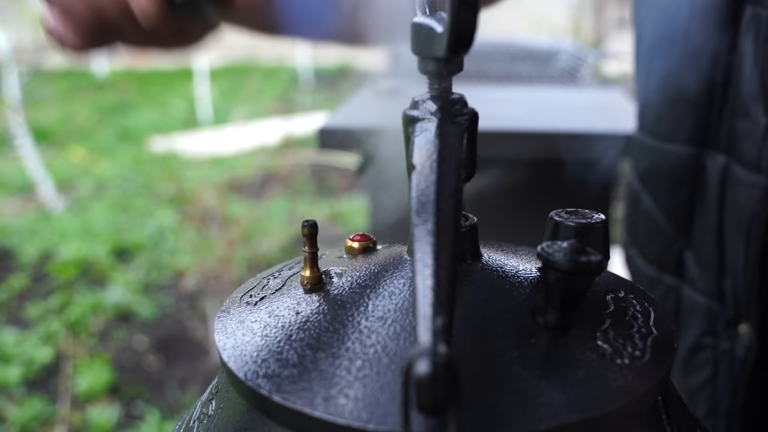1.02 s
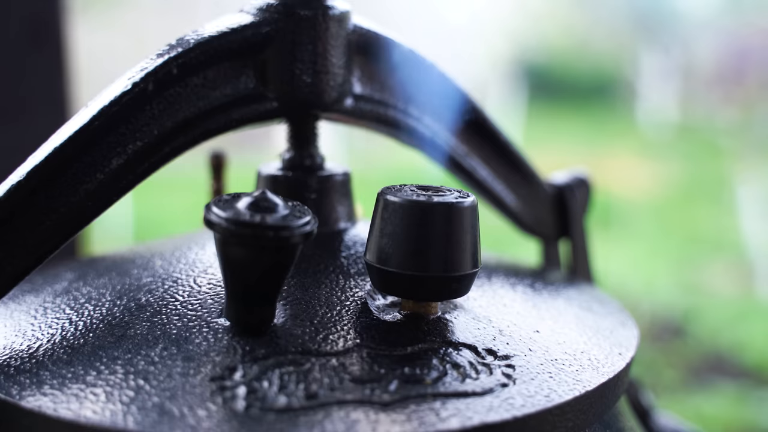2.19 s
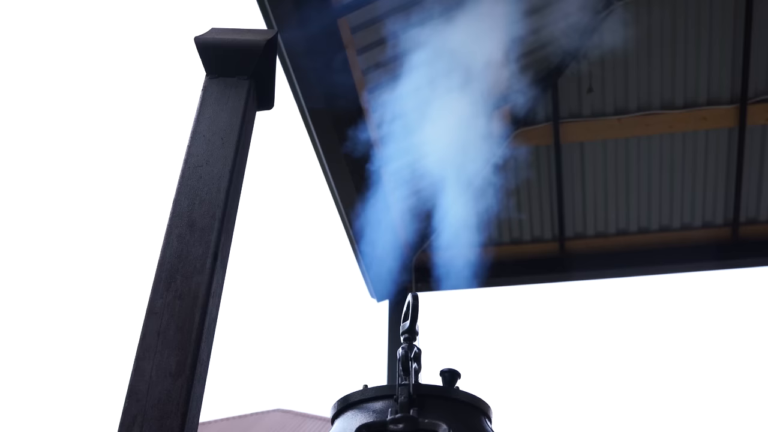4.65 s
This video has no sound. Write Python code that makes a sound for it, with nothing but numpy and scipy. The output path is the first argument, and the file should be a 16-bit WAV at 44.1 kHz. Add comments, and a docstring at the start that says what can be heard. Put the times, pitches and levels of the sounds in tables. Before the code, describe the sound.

A pot's valve sputters out bursts of steam, then hisses more evenly over a faint fire rumble and distant birdsong.

```python
"""Steam escapes from the pressure valve of a cast pot on a garden fire, heard from close by.
At first the jet hisses and the hollow in the valve rings, while far birds sing, mostly covered.
About half a second in, the valve chokes, bursts free with a ring and spits gushes, most falling in pitch.
Side leaks open and shut, the pot knocks once, and near 3.6 s more gushes follow.
Then the steam settles to an even hiss over the low rumble of the fire."""
import sys
import numpy as np
from scipy import signal
from scipy.io import wavfile

SR = 44100
rng = np.random.default_rng(int(sys.argv[2]) if len(sys.argv) > 2 else 0)


def transcribe(u):
    """Save the signal u as a 16-bit wav file named by the first command-line argument.

    u: samples, shape (n,) or (channels, n), limited to [-1, 1]; the rate is SR.
    q: integer samples, one column per channel.
    """
    v = np.clip(np.atleast_2d(u).T, -1, 1)
    q = np.round(v * 32767).astype(np.int16)
    wavfile.write(sys.argv[1], SR, q)


N = 278271
TIME = np.arange(N) / SR

# Gushes of steam, each sliding through the pitches: t/s at GUSH_PIVOT_HZ, fall time/s per octave,
# swell width/s, lowest f/Hz, highest f/Hz, level/dB, ring of the hollow/dB, loss of sizzle/dB
GUSHES = [ (.643, 0.009, 0.021, 1300, 6500, -12.5, -44.5, -1),
          (0.684, 0.0047, 0.022, 560, 1660, -3, -46, -1), (.9, -0.019, 0.025, 1310, 8000, -7.5, -49, 3),
          (.957, -.006, 0.0049, 3800, 14000, -6, -65, -7), (1.002, 0.02, 0.026, 540, 3880, -0.5, -41.5, 8),
          (1.0, -0.0003, 0.012, 6400, 8300, 1, -65, -4), (3.62, 0.037, 0.028, 6800, 9500, -3, -50, 8),
          (3.67, 0.021, 0.033, 328, 3200, 1.5, -51, -5), (3.785, 0.0035, 0.018, 70, 203, 1, -73, -3.5), ]
GUSH_PIVOT_HZ = 3200


def jet():
    """Tiny swirls at the opening hiss, and drops torn off the rim tick. Gushes dim or lift the sizzle."""
    # strength of the jet: t/s, hiss level/dB, sizzle level/dB
    levels = [(0.0, -57, -48.5), (0.22, -57, -46), (0.48, -57, -48.5), (0.6, -59.0, -49),
              (0.63, -46.5, -41.4), (0.68, -43.5, -39.5), (0.85, -47, -37), (1.25, -50.5, -41),
              (1.5, -52, -43.5), (2.25, -53.5, -49.5), (2.28, -53.1, -48), (2.87, -55.5, -47),
              (2.91, -54.5, -41), (3.4, -53, -46.5), (4.68, -54.5, -48), (4.9, -54.9, -56),
              (5.6, -57.5, -57), (6.31, -54.5, -56)]
    # tone colour of the hiss and of the finer sizzle: f/Hz, level/dB
    hiss_spectrum = [(3800, -28), (5000, -12.5), (6300, -5), (7200, -4.5), (8000, -1), (10000, 0),
                     (12000, -0.5), (16500, -2.5)]
    sizzle_spectrum = [(9500, -27), (11000, -8), (12000, -4), (12900, -0.5), (14000, 3), (15000, 1),
                       (16500, 8)]
    hiss_db, sizzle_db = in_time(levels)
    loss_db = sum(db * swell(s, width_s) for s, _, width_s, *_, db in GUSHES)
    hiss = shaped_noise(hiss_spectrum, flicker_db=1.13, flicker_hz=68, bands=14)
    sizzle = shaped_noise(sizzle_spectrum, flicker_db=1.7, flicker_hz=16, bands=9)
    drops = (rng.random(N) < 200 / SR) * rng.uniform(-5, 5, N)  # about 200 a second
    ticks = keep_band(drops + 1e-18, 1500, 14000)
    sizzle_gain = from_db(sizzle_db + 2 - loss_db + 0.5 * drift(7.8))
    stream = from_db(hiss_db + 4.5) * (hiss + ticks) + sizzle_gain * sizzle
    return from_db(steam_dips_db()) * stream


def steam_dips_db():
    """The valve chokes near 0.5 s, and the sound dips for an instant near 0.93 s."""
    # brief drops in the steam's level: start t/s, end t/s, depth/dB
    dips = [(0.446, 0.612, 8), (0.918, 0.935, 5)]
    falling, rising = 0.71, 0.084  # shares of a dip's length
    loss_db = np.zeros(N)
    for start, end, depth_db in dips:
        age = (TIME - start) / (end - start)
        loss_db += depth_db * np.clip(np.minimum(age / falling, (1 - age) / rising), 0, 1)
    return -loss_db


def gushes():
    """Bands of noise swell in turn: in a falling gush, small swirls come first and large ones after."""
    # tone colour of a gush: f/Hz, level/dB
    spectrum = [(100, -12), (370, -13.5), (630, -14.5), (1000, -8), (1500, -7), (2200, -2.5), (3400, -3.5),
                (5000, -0.5), (6700, -3.5), (8600, -5), (11000, 1.5), (15000, -20)]
    gain_db, edge_db_per_octave = -28.5, 34
    edges = np.geomspace(60, 16000, 25)
    white, out = rng.standard_normal((2, N)), 0
    for k, (low, high) in enumerate(zip(edges, edges[1:])):
        hz, gain = np.sqrt(low * high), 0
        for s, fall_s, width_s, lowest_hz, highest_hz, db, *_ in GUSHES:
            octaves_outside = max(np.log2(lowest_hz / hz), np.log2(hz / highest_hz), 0)
            peak_s = s + fall_s * np.log2(GUSH_PIVOT_HZ / hz)
            gain += from_db(db - edge_db_per_octave * octaves_outside) * swell(peak_s, width_s)
        out += from_db(gain_db + at_hz(spectrum, hz)) * gain * keep_band(white[k % 2], low, high)
    return from_db(steam_dips_db()) * out


def valve_hollow():
    """Steam blows across the hollow under the valve weight, and each gush makes it ring."""
    # flow through the hollow: t/s, level/dB
    levels = [(0.0, -56.5), (1.0, -56), (1.1, -54), (2.25, -58.0), (2.28, -53), (2.8, -55), (3.5, -51),
              (3.85, -59.5), (4.3, -58.5), (4.75, -55.5), (5.5, -58.0), (6.31, -56.5)]
    # pitches the hollow rings at: f/Hz, width/Hz, level/dB
    modes = [(2960, 640, -9), (3460, 640, -4.5), (3762, 680, -8)]
    hz_per_db = 10  # more flow raises the pitch
    rise_s, rise_step_hz = 4.69, 139.5  # from here on the ringing is a little higher in pitch
    level_db, = in_time(levels)
    rise_hz = hz_per_db * (level_db - level_db.mean()) + rise_step_hz * (TIME > rise_s)
    ringing = sum(from_db(db) * pitched_noise(hz + rise_hz, width) for hz, width, db in modes)
    bursts = sum(from_db(ring_db) * swell(s, width_s) for s, _, width_s, *_, ring_db, _ in GUSHES)
    steady = from_db(level_db + 1.2 + 0.6 * steam_dips_db())
    flow = np.hypot(steady, from_db(steam_dips_db()) * bursts)
    return flow * from_db(1.26 * drift(61)) * ringing


def plume():
    """Larger swirls above the valve give a soft, lumpy roar."""
    # strength of the swirls: t/s, level/dB
    levels = [(0.0, -73.6), (0.6, -73), (0.95, -74.5), (1.1, -64), (2.1, -71), (2.25, -71), (2.28, -65.5),
              (2.85, -65.5), (3.05, -71.2), (3.4, -68), (4.1, -69.5), (4.75, -65.5), (5.3, -69.5),
              (6.31, -67.5)]
    # tone colour of the roar: f/Hz, level/dB
    spectrum = [(130, -24), (200, -11.5), (330, -3.5), (480, -5.5), (800, -3.5), (1300, -1), (2200, 1),
                (3000, 1), (4400, -0.5), (6000, -7), (8000, 0.5)]
    level_db, = in_time(levels)
    roar = shaped_noise(spectrum, flicker_db=0.7, flicker_hz=17, bands=18)
    return from_db(level_db + 12.5 + steam_dips_db()) * roar


def pitched_hisses():
    """Narrow bands of hiss come, flutter and go: side leaks, and the valve's ring in the first burst."""
    # bands of pitched hiss: start t/s, end t/s, f/Hz, width/Hz, start level/dB, end level/dB
    hisses = [(0, 0.513, 4850, 2000, -57.5, -57.5), (0.599, 0.697, 3590, 450, -38.5, -46),
              (0.599, .7, 5700, 900, -48, -50), (0.641, .9, 11650, 800, -38, -51),
              (0.654, .88, 10400, 1600, -41.5, -51), (1.021, 2.0, 8770, 1710, -46, -61.5),
              (1.049, 2.0, 2657, 895, -58.5, -67), (2.886, 3.554, 5180, 1170, -57, -51),
              (2.899, 3.554, 3670, 380, -56.5, -54.5), (2.956, 3.55, 11600, 1300, -49.5, -53),
              (4.694, 4.9, 4480, 1800, -57, -67), (4.848, 6.31, 4470, 1000, -65.5, -65.5),
              (4.691, 6.31, 3760, 318, -65.5, -63.5), (6.15, 6.25, 12700, 5000, -50, -55)]
    out = np.zeros(N)
    for start, end, hz, width_hz, start_db, end_db in hisses:
        at = span(start, end)
        level = from_db(np.linspace(start_db, end_db, len(at))) * fade(len(at), edge_s=0.038)
        out[at] += level * pitched_noise(np.full(len(at), float(hz)), width_hz)
    return out * from_db(1.65 * drift(23))


def sputter():
    """Wet steam flows unevenly, most of all in a gush; gives a wobbling gain."""
    gushing = sum(swell(s, width_s) for s, _, width_s, *_ in GUSHES)
    uneven_db = 0.04 + 0.44 * gushing
    return from_db(uneven_db * (2.4 * drift(27) + 0.43 * drift(220)))


def near_echoes(x):
    """Close surfaces throw the hiss back and colour it faintly."""
    # echoes off the lid and the ground: delay/s, level/dB
    echoes = [(.0031, -35), (.0074, -23), (0.012, -25.5)]
    return x + sum(from_db(db) * np.pad(x, (round(s * SR), 0))[:N] for s, db in echoes)


def knock():
    """A soft bump makes the heavy pot ring briefly."""
    # a dull knock and its bounces: t/s, level/dB
    bumps = [(1.644, -48), (1.648, -48.5), (1.656, -52)]
    # tones of the pot: f/Hz, level/dB, time to fade by 60 dB/s
    modes = [(150, -4.5, 0.057), (250, -1, 0.026), (644, -1, 0.039), (1050, 4.5, 0.017), (1370, 3, 0.051),
             (1610, 2.5, 0.015), (1810, 1, .02)]
    clicks, out = np.full(N, 1e-18), 0
    for s, db in bumps:
        clicks[round(s * SR)] = from_db(db)
    for k, (hz, db, ring_s) in enumerate(modes):
        decay, angle = from_db(-60 / (ring_s * SR)), 2 * np.pi * hz / SR  # per sample
        ring = signal.lfilter([0, np.sin(angle)], [1, -2 * decay * np.cos(angle), decay ** 2], clicks)
        out += (-1) ** k * from_db(db) * ring
    return out


def fire():
    """The fire under the pot gives a low, flickering rumble."""
    # strength of the fire: t/s, level/dB
    levels = [(0.0, -76), (0.85, -82.5), (1.2, -75.4), (2.2, -80), (2.35, -75.7), (3.2, -82), (4.2, -72.5),
              (5.2, -80), (6.31, -80.5)]
    # tone colour of the rumble: f/Hz, level/dB
    spectrum = [(22, -26), (40, -5), (60, -11.5), (100, 6), (135, 0), (200, -3), (400, -11.5), (900, -11)]
    level_db, = in_time(levels)
    return from_db(level_db + 1.5) * shaped_noise(spectrum, flicker_db=1.0, flicker_hz=48, bands=10)


def birds():
    """Birds whistle pure notes and runs of quick falling chirps."""
    # whistled notes, one curve each: t/s, f/Hz, level/dB
    notes = [
        [(0.07, 1450, -79), (0.17, 1980, -76), (0.26, 2230, -79)],
        [(0.32, 2700, -70), (0.37, 2540, -71), (0.405, 2120, -68), (0.442, 1885, -66), (0.505, 1910, -63),
         (0.52, 1820, -75)],
        [(0.572, 2200, -74), (0.589, 2170, -62), (0.66, 2260, -61)],
        [(0.72, 2180, -63), (0.774, 1900, -61), (0.815, 1860, -65)],
        [(1.03, 2760, -68), (1.12, 2680, -78)],
        [(0.155, 5100, -64), (0.225, 4800, -68)],
        [(0.89, 5820, -61), (0.96, 5830, -63)],
        [(2.08, 4250, -72), (2.21, 4000, -65)],
        [(3.19, 3200, -69), (3.34, 2790, -70)],
    ]
    # a small bird's runs: first t/s, last t/s, spacing/s, length/s, start f/Hz, end f/Hz, level/dB
    runs = [ (0.238, .59, .0685, 0.035, 5200, 3600, -62.5), (.728, .8, .072, 0.029, 5200, 3550, -67),
            (1.213, 1.82, .2, 0.041, 5300, 4130, -65.5), (2.41, 3.034, 0.62, 0.09, 4500, 3150, -70),
            (3.422, 3.616, .194, 0.1, 4340, 3250, -64.5), (4.358, 5.092, 0.8, 0.056, 5180, 3260, -69),
            (5.396, 6.0, 0.12, 0.032, 4900, 3380, -69), ]
    out, waver = np.zeros(N), 1 + 0.021 * drift(90)
    for curve in notes:
        at = span(curve[0][0], curve[-1][0])
        hz, db = in_time(curve)
        out[at] += from_db(db[at]) * fade(len(at), edge_s=0.008) * tone((hz * waver)[at])
    for first, last, every, length, start_hz, end_hz, db in runs:
        for start in np.arange(first, last + every / 2, every):
            at = span(start, start + length)
            hz = np.geomspace(start_hz, end_hz, len(at)) * waver[at]
            out[at] += from_db(db) * fade(len(at), edge_s=0.002) * tone(hz)
    return out


def garden(x):
    """Far sound from one side reaches the right ear later; trees and walls add a short echo."""
    echo_s, ear_delay_s = 0.36, 0.00012
    t = TIME[:SR // 2]
    tail = rng.standard_normal((2, len(t))) * from_db(-60 * t / echo_s)
    tail /= np.sqrt(np.sum(tail ** 2, axis=1, keepdims=True))
    direct = np.array([x, np.interp(TIME - ear_delay_s, TIME, x)])
    echo = signal.fftconvolve(x[None], tail, axes=1)[:, :N]
    return from_db(3.0) * direct + from_db(0.5) * echo


def open_air():
    """The outdoor air murmurs faintly, with its own noise in each ear."""
    # tone colour of the air: f/Hz, level/dB
    spectrum = [(25, -19), (70, 10), (130, 1), (400, 2), (700, -3), (1200, -70)]
    ears = [shaped_noise(spectrum, flicker_db=-2.0, flicker_hz=1.5, bands=8) for ear in range(2)]
    return from_db(-79.5) * np.array(ears)


def from_db(db):
    """Turns decibels into a factor to multiply by."""
    return 10 ** (np.asarray(db) / 20)


def rms_one(x):
    """Scales a signal to an average strength (rms) of 1."""
    return x / np.sqrt(np.mean(x ** 2) + 1e-20)


def in_time(rows):
    """The columns of a curve at every sample."""
    s, *columns = np.transpose(rows)
    return [np.interp(TIME, s, c) for c in columns]


def at_hz(spectrum, hz):
    """The level of a spectrum at one pitch, with octaves evenly spaced."""
    pitches, levels = np.transpose(spectrum)
    return np.interp(np.log(hz), np.log(pitches), levels)


def drift(rate_hz):
    """A smooth random wobble of strength 1; a higher rate makes it quicker."""
    step, warm_up = 40, 2000
    pole = np.exp(-2 * np.pi * step * rate_hz / SR)
    white = rng.standard_normal(N // step + warm_up + 2)
    slow = signal.lfilter([1], [1, -2 * pole, pole * pole], white)[warm_up:]
    return np.interp(np.arange(N) / step, np.arange(len(slow)), rms_one(slow))


def keep_band(x, low_hz, high_hz):
    """Lets through the sound between two pitches."""
    return signal.sosfilt(signal.butter(2, [low_hz, high_hz], "band", fs=SR, output="sos"), x)


def shaped_noise(spectrum, flicker_db, flicker_hz, bands):
    """Bands of noise that follow a spectrum, each flickering on its own; strength 1."""
    edges = np.geomspace(spectrum[0][0], min(spectrum[-1][0], SR / 2 - 1000), bands + 1)
    white, out = rng.standard_normal((2, N)), 0
    for k, (low, high) in enumerate(zip(edges, edges[1:])):
        level_db = at_hz(spectrum, np.sqrt(low * high)) + flicker_db * drift(flicker_hz)
        out += from_db(level_db) * keep_band(white[k % 2], low, high)
    return rms_one(out)


def pitched_noise(hz, width_hz):
    """Noise gathered around a pitch that is given for every sample; strength 1."""
    narrow = signal.butter(3, width_hz / 2, fs=SR, output="sos")
    a, b = signal.sosfilt(narrow, rng.standard_normal((2, N))[:, :len(hz)])
    phase = 2 * np.pi * np.cumsum(hz) / SR
    return rms_one(a * np.cos(phase) + b * np.sin(phase))


def tone(hz):
    """A pure tone on a moving pitch; strength 1."""
    return np.sqrt(2) * np.sin(2 * np.pi * np.cumsum(hz) / SR)


def span(start, end):
    """Sample numbers between two times, at least 200 of them."""
    first = int(np.clip(start * SR, 0, N - 200))
    return np.arange(first, int(np.clip(end * SR, first + 200, N)))


def fade(count, edge_s):
    """A soft opening and closing."""
    k = np.arange(count)
    return np.clip(np.minimum(k, k[::-1]) / (edge_s * SR), 0, 1)


def swell(middle_s, width_s):
    """A smooth rise to 1 and fall around a moment."""
    return np.exp(-np.minimum(((TIME - middle_s) / (2 * width_s)) ** 2, 50))


def scene():
    """The sputtering steam and the fire are straight ahead; open air and birds lie around them."""
    steam = near_echoes(sputter() * (jet() + valve_hollow() + plume() + gushes() + pitched_hisses()))
    dip = from_db(-5 * ((TIME > 2.255) & (TIME < 2.265)))  # the level dips briefly
    return (steam + knock() + fire() + open_air() + garden(birds())) * dip


def record(dry):
    """The highest treble is cut off steeply."""
    cutoff_hz = 15750
    return signal.sosfilt(signal.ellip(12, 0.1, 80, cutoff_hz, fs=SR, output="sos"), dry)


dry = scene()
out = record(dry)
transcribe(out)
```